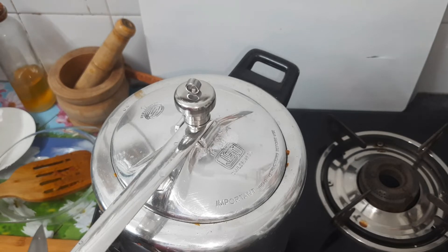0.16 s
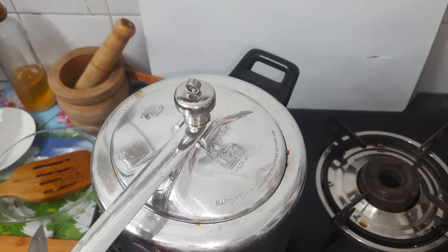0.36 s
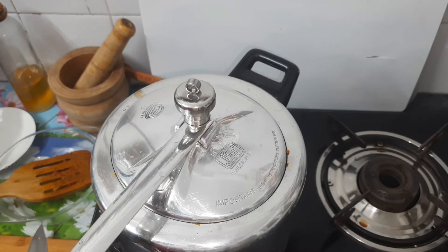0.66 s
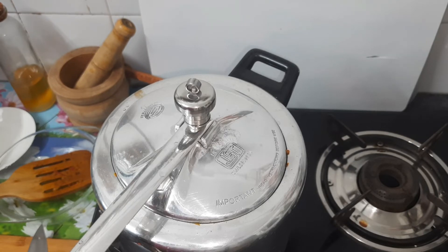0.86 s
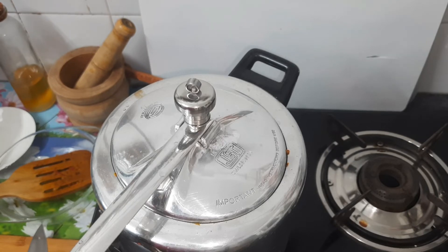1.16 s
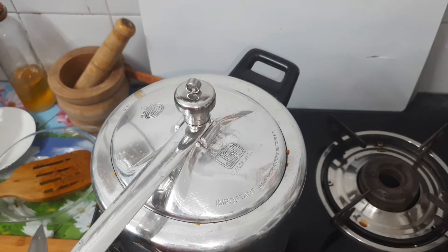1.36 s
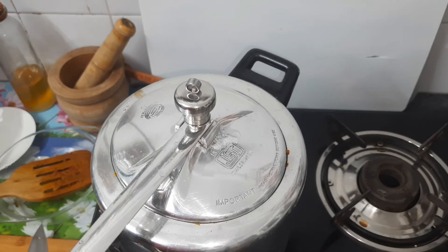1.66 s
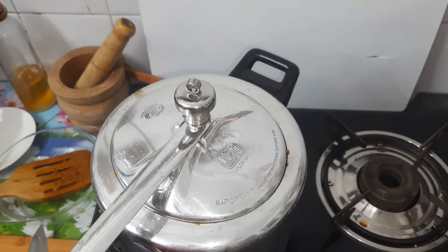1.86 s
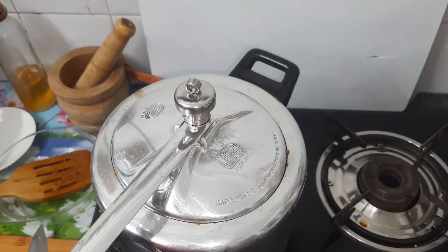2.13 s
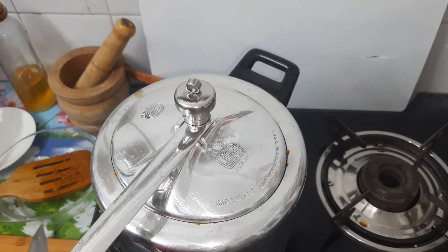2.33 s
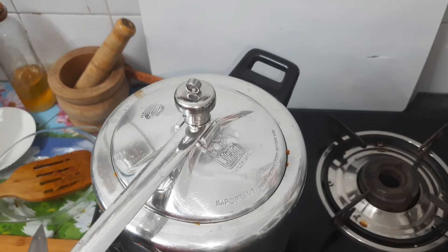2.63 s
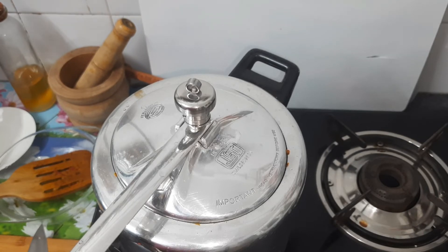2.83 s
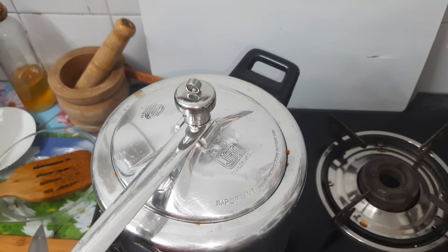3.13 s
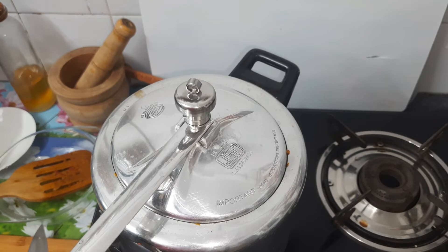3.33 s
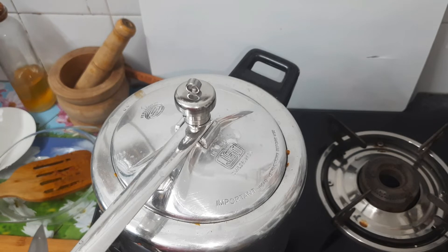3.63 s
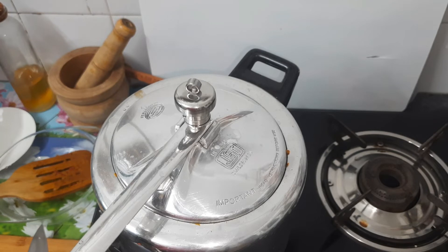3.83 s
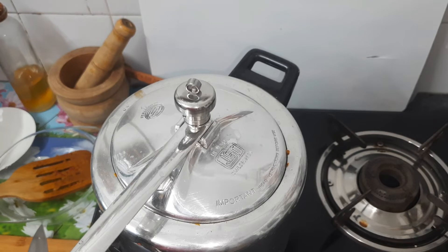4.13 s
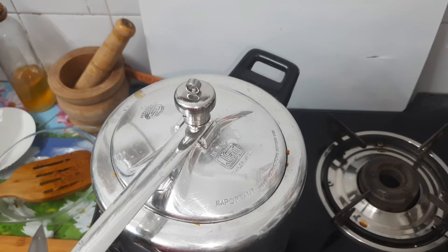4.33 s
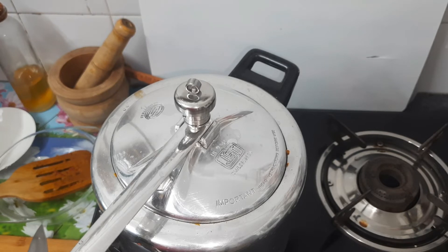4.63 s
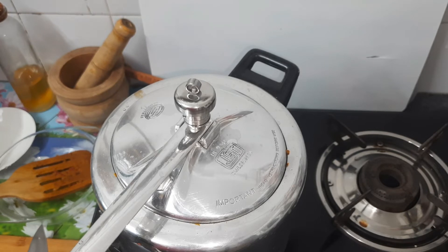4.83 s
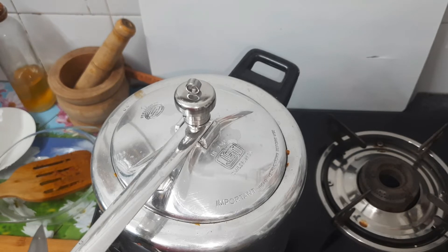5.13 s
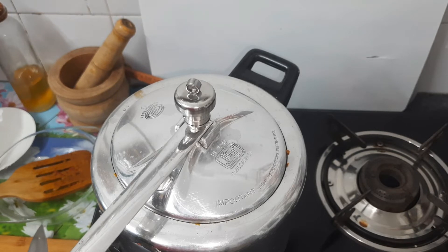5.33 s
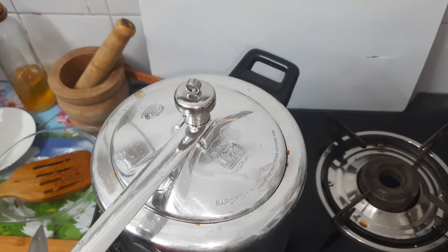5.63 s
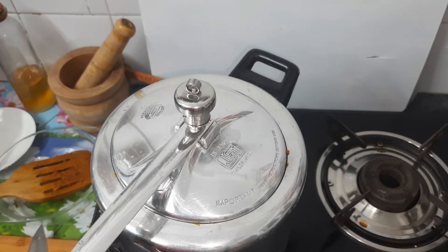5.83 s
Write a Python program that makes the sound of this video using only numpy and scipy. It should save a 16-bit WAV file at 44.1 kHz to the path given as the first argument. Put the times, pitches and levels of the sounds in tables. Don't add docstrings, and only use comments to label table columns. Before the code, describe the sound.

Close, steady, sharp steam hiss from a pressure cooker, fluttering and surging constantly, with tiny spitting droplets over a very faint kitchen hum.

```python
import sys
import numpy as np
from scipy import signal
from scipy.fft import rfft, irfft
from scipy.io import wavfile
from scipy.ndimage import uniform_filter1d

SR = 44100
rng = np.random.default_rng(int(sys.argv[2]) if len(sys.argv) > 2 else 0)


def pcm_store(signal):
    levels = np.round(np.clip(np.atleast_2d(signal), -1, 1) * 32767)
    wavfile.write(sys.argv[1], SR, levels.astype(np.int16).T)


def gain_from_db(level_db):
    decades = np.asarray(level_db, float) / 20
    return 10 ** decades


N = 263718

# peak in seconds, rise in seconds, flow in dB,
# extra sharpness in dB.
BREATHS = [(0.25, 0.085, 1.5, -0.1), (0.64, 0.08, 0.1, -1.2), (0.75, 0.07, 1.5, 2), (0.91, 0.033, -2.5, 0),
           (1.1, 0.11, 1.5, 0), (1.19, 0.035, -2.0, 0), (1.43, 0.27, 2, 0.2), (1.58, 0.075, -3, -3),
           (1.87, 0.06, 1, -0.5), (1.97, 0.036, 0.5, -1), (2.07, 0.055, 2.5, 2), (2.23, 0.06, -1, -1),
           (2.35, 0.11, 1.7, 1.5), (2.62, 0.12, 1.3, 0), (3.53, 0.044, -0.9, -1.2), (4.05, 0.25, 3, -0.7),
           (4.17, 0.032, -2.5, -1.5), (4.31, 0.16, -2.5, -0.2), (4.7, 0.11, 2.5, 0.5), (4.96, 0.03, 1.8, 0),
           (5.24, 0.043, -1.2, -1.5), (5.4, 0.049, -2.5, -3), (5.64, 0.14, 3.0, -0.5),
           (5.98, 0.091, 2.5, -1)]
# peak in seconds, rise in seconds, fullness in dB.
LIFTS = [(-0.05, 0.08, 3), (1.03, 0.037, 2.4), (1.13, 0.04, 7), (1.29, 0.08, 2.6), (1.62, 0.09, 2.5),
         (2.1, 0.08, 2.1), (2.41, 0.13, 4), (3.39, 0.05, 1.8), (3.64, 0.06, 2.4), (3.93, 0.19, 4.5),
         (4.11, 0.058, 7.5), (4.83, 0.19, 5.5), (5.64, 0.12, 7), (6.03, 0.26, 7)]
# peak in seconds, rise in seconds, level in dB.
WELLS = [
    (1.6, .06, 3.5),
    (2.45, .08, 2),
    (2.9, 0.13, 3),
    (4.03, 0.072, 2),
    (5.76, .07, 3),
]
# frequency in Hz, level in dB.
JET_COLOUR = [(2300, -31.6), (3150, -26.8), (3700, -14.6), (4800, -12.6), (5600, -2.4), (6300, -6.3),
              (7000, -10.0), (8000, 0.9), (9800, -1.7), (11200, -9.8), (13800, -11.9), (14400, -17.1),
              (15650, -27.0)]
# frequency in Hz, width in Hz, gain in dB.
LID_MODES = [(4175, 142, 2.5), (4566, 76, 4.6), (5403, 100, -4.5), (5564, 107, -2.3), (5907, 78, 8.3),
             (5935, 500, -6.5), (6088, 66, 4.6), (6246, 67, -4.4), (6414, 52, -3.9), (6822, 478, 9.0),
             (6984, 85, 2.9), (7108, 160, 4.7), (7455, 48, -2.1), (7658, 136, -3.0), (8005, 132, -4.1),
             (8186, 127, -2.8), (8496, 157, -5.1), (8864, 144, -4.2), (9214, 50, -3.1), (9541, 178, 2.7),
             (10003, 48, -3.9), (10392, 106, -4.1), (10695, 90, -3.0), (11002, 60, -2.6), (11134, 118, 4.9),
             (11558, 101, -2.5), (12285, 125, 2.6), (14250, 342, -4.6), (2955, 70, 4.5), (3200, 70, -4)]
# delay in ms, linear gain.
ECHOES = [(1.168, -0.08), (1.788, -0.07), (1.921, 0.05), (2.433, -0.05), (2.519, 0.03), (2.636, 0.05),
          (2.754, 0.07), (3.007, 0.06), (3.072, -0.08), (3.246, -0.07), (3.35, -0.05), (3.624, 0.05)]
# frequency in Hz, density in dB per Hz.
RUSH_COLOUR = [(430, -11), (520, -7), (600, -3), (680, -2), (780, -4), (1050, -2.5), (1650, -2.5),
               (2100, -3), (2270, -5), (2450, -1), (2650, 0.5), (2850, -5)]
# frequency in Hz, density in dB per Hz.
BURNER_COLOUR = [(22, -11), (38, -20), (47, -3.5), (62, -1), (92, -4), (118, -5.5), (135, -5.5), (165, -9),
                 (185, -6.5), (220, -14), (280, -9), (390, -11.5), (500, -13), (600, -24)]
# frequency in Hz, halo width in Hz, level in dB.
HUM = [
    (48.6, 3, -75),
    (100, 4, -70),
    (117, 5.5, -76.5),
    (145.4, 4.7, -70.5),
    (195, 8, -81),
    (410, 6, -80.5),
]
# time in seconds, low edge in Hz, high edge in Hz, side level in dB.
SPLITS = [
    (.03, 12400, 13800, -50),
    (.311, 8200, 9900, -37),
    (.311, 13000, 15700, -43),
    (1.447, 13700, 15500, -52),
    (2.633, 8900, 10400, -37),
    (3.677, 4200, 5170, -53),
    (4.003, 4550, 5800, -47),
    (4.881, 14400, 15700, -57),
]
# time in seconds, peak in dB.
SPITS = [(0.9847, -21), (1.0827, -16), (1.1334, -19), (1.169, -15), (1.612, -18), (1.7295, -24),
         (2.0794, -22), (2.6088, -20), (2.885, -17), (3.0124, -18), (4.1614, -19), (5.4327, -18),
         (5.6017, -16), (5.664, -24), (5.6756, -23), (5.6854, -19)]
# time in seconds, peak in dB, frequency in Hz.
GURGLES = [
    (1.674, -54, 1070),
    (5.705, -56, 600),
    (5.718, -55, 1240),
    (5.735, -51, 1030),
    (5.748, -51, 1020),
    (5.783, -53, 894),
    (5.829, -59, 1280),
]

BREATH_FALL, LIFT_FALL, WELL_FALL = 1.26, 1.54, 1.1
FLOW_DB, RUSH_DB, BURNER_DB = -30, -65.5, -63.5
EDGE_DB, BODY_DB, TOP_DB = -2, 0.65, -1.5
EDGE_HOLDS, BODY_HOLDS, BODY_YIELDS = 0.53, 0.087, 0.59
RUSH_PER_LIFT, BRIGHT_DB = 0.37, 1.1
DRYING_DB_PER_S, THINNING_DB_PER_S = 0.59, 0.17


def evened(x):
    return x / np.sqrt(np.mean(x ** 2) + 1e-20)


def read(points, hz, skirt_db=30):
    f, value = np.transpose(points)
    outside = np.abs(np.log2((hz + 1) / np.clip(hz + 1, f[0], f[-1])))
    return np.interp(np.log(hz + 1), np.log(f), value) - skirt_db * outside


def coloured(x, gain):
    return irfft(rfft(x) * gain, len(x))


def wander(top_hz, slope):
    hz = np.fft.rfftfreq(N, 1 / SR)
    shape = (hz > 2) * (hz + 1) ** -slope / (1 + (hz / top_hz) ** 4)
    return evened(coloured(rng.standard_normal(N), shape))


def swells(t, peak_s, rise_s, db, fall):
    since_s = t[:, None] - peak_s
    width_s = rise_s * np.where(since_s > 0, fall, 1)
    return (db * np.exp(-(since_s / width_s) ** 2)).sum(axis=1)


def gap(t):
    peak_s, rise_s, flow_db, sharp_db = np.transpose(BREATHS)
    flow = swells(t, peak_s, rise_s, flow_db, BREATH_FALL)
    sharp = swells(t, peak_s, rise_s, sharp_db, BREATH_FALL)
    lift = swells(t, *np.transpose(LIFTS), LIFT_FALL)
    well = swells(t, *np.transpose(WELLS), WELL_FALL)
    return flow, sharp, lift, well


def turbulence():
    gusts_db = 0.53 * wander(45, 0.1) + 1.02 * wander(920, 0.1)
    eddies = rng.standard_normal(N) * gain_from_db(gusts_db)
    hz, t, z = signal.stft(eddies, SR, nperseg=256, noverlap=192)
    flow_db, sharp_db, lift_db, _ = gap(t)
    edge_db = EDGE_DB + lift_db - EDGE_HOLDS * flow_db
    body_db = BODY_DB - BODY_HOLDS * flow_db - BODY_YIELDS * sharp_db - THINNING_DB_PER_S * t
    top_db = TOP_DB + sharp_db + DRYING_DB_PER_S * t
    under = np.clip((3650 - hz) / 300, 0, 1)[:, None]
    edge = under * np.clip((hz - 2000) / 700, 0, 1)[:, None]
    body = np.clip((7600 - hz) / 900, 0, 1)[:, None] - under
    top = np.clip((hz - 10300) / 2600, 0, 1.5)[:, None]
    patches = rng.standard_normal(z.shape[::-1]).T
    patches = uniform_filter1d(patches, size=7, axis=0)
    patches = evened(uniform_filter1d(patches, size=30, axis=1))
    z = z * gain_from_db(edge * edge_db + body * body_db + top * top_db + 0.71 * patches)
    return signal.istft(z, SR, nperseg=256, noverlap=192)[1][:N]


def lid_response(size=8192):
    hz = np.abs(np.fft.fftfreq(size, 1 / SR))
    db = read(JET_COLOUR, hz, skirt_db=50)
    for f, width_hz, gain_db in LID_MODES:
        db += gain_db / (1 + (2 * (hz - f) / width_hz) ** 2) ** 2
    db -= 6 * np.clip((2920 - hz) / 150, 0, 1)
    echoes = 1 + sum(g * np.exp(-2j * np.pi * hz * ms / 1000) for ms, g in ECHOES)
    log_gain = np.log(gain_from_db(np.maximum(db, -100)) * abs(echoes))
    return np.fft.ifft(np.exp(np.conj(signal.hilbert(log_gain)))).real[:size // 2]


def walls(x, wet_db=-14, t60_s=0.14):
    t = np.arange(4000) / SR
    tail = rng.standard_normal(4000) * gain_from_db(-60 * t / t60_s) * (t > .004)
    return x + gain_from_db(wet_db) * signal.oaconvolve(x, tail / np.linalg.norm(tail))[:N]


def steam():
    drop_db = 2.9 * np.minimum(rng.exponential(1, N), 4)
    struck = rng.random(N) < 250 / SR
    spray = rng.choice([-1., 1.], N) * gain_from_db(drop_db) * struck
    source = evened(turbulence()) + gain_from_db(3.0) * spray
    hiss = signal.oaconvolve(source, lid_response())[:N]
    flow_db = gap(np.arange(N) / SR)[0]
    return walls(evened(hiss) * gain_from_db(FLOW_DB + flow_db))


def rush():
    t, hz = np.arange(N) / SR, np.fft.rfftfreq(N, 1 / SR)
    noise = rng.standard_normal(N) * gain_from_db(0.63 * wander(60, 0.24))
    noise = evened(coloured(noise, gain_from_db(read(RUSH_COLOUR, hz, skirt_db=43))))
    upper = coloured(noise, np.clip((hz - 1000) / 400, 0, 1))
    _, _, lift_db, well_db = gap(t)
    tilted = noise + (gain_from_db(BRIGHT_DB - well_db) - 1) * upper
    return tilted * gain_from_db(RUSH_DB + RUSH_PER_LIFT * lift_db + well_db)


def kitchen():
    t, hz = np.arange(N) / SR, np.fft.rfftfreq(N, 1 / SR)
    rumble = coloured(rng.standard_normal(N), gain_from_db(read(BURNER_COLOUR, hz, skirt_db=35)))
    out = gain_from_db(BURNER_DB) * evened(rumble)
    for f, width_hz, db in HUM:
        halo = evened(coloured(rng.standard_normal(N), 1 / (1 + (2 * (hz - f) / width_hz) ** 2)))
        tone = np.sin(2 * np.pi * (f * t + rng.random()))
        out += gain_from_db(db) * (0.59 * halo + 1.15 * tone)
    return out


def splits():
    side, n, k = np.zeros(N + 4096), np.arange(2048), np.arange(1024)
    first = 360
    rise = np.cumsum(signal.windows.kaiser(1025, 4 * np.pi))
    window = np.sqrt(np.r_[rise[:-1], rise[-2::-1]] / rise[-1])
    for s, low_hz, high_hz, db in SPLITS:
        hz = k * SR / 2048
        used = k[(hz > low_hz) & (hz < high_hz)]
        cosines = np.cos(np.pi / 1024 * np.outer(used + .5, n + 512.5))
        block = rng.standard_normal(len(used)) @ cosines
        start = first + 1024 * round((s * SR - first) / 1024)
        side[start:][:2048] += gain_from_db(db) * evened(block) * window
    return side[1024:N + 1024]


def spits():
    out, t = np.zeros(N + 400), np.arange(400) / SR
    for s, db in SPITS:
        crackle = rng.standard_normal(400) * np.exp(-t / 0.00062)
        out[round(s * SR):][:400] += gain_from_db(db) * crackle
    colour = [(1300, -25.5), (2600, -24), (4000, -4), (8000, 5)]  # Hz, dB
    return coloured(out[:N], gain_from_db(read(colour, np.fft.rfftfreq(N, 1 / SR), skirt_db=15)))


def gurgles():
    out, t = np.zeros(N + 600), np.arange(600) / SR
    for s, db, hz in GURGLES:
        pop = np.sin(2 * np.pi * hz * t) * np.exp(-t / 0.0021)
        out[round(s * SR):][:600] += gain_from_db(db - 0.5) * pop
    return out[:N]


def scene():
    mono = steam() + rush() + kitchen() + spits() + gurgles()
    return np.tile(mono, (2, 1))


def roll_off(x):
    return signal.sosfilt(signal.butter(12, 16230, fs=SR, output="sos"), x)


def record(dry):
    lowpass = signal.firwin(1023, 15730, window=("kaiser", 9), fs=SR)
    limited = signal.oaconvolve(dry, lowpass[None], "same")
    mix = limited + splits() * [[1], [-1]]
    return roll_off(mix)


dry = scene()
out = record(dry)
pcm_store(out)
```